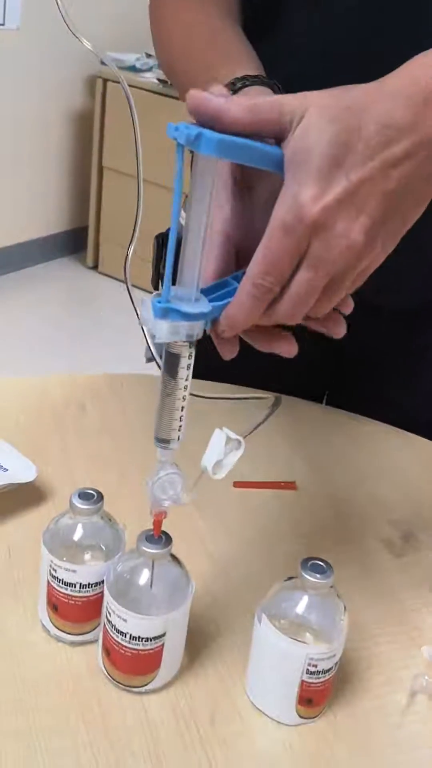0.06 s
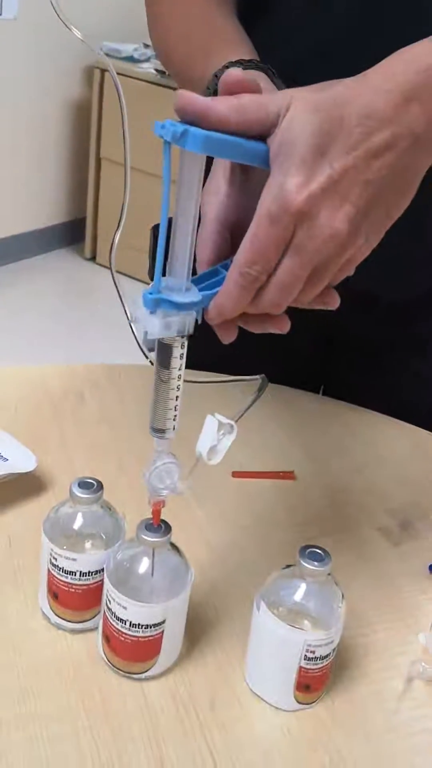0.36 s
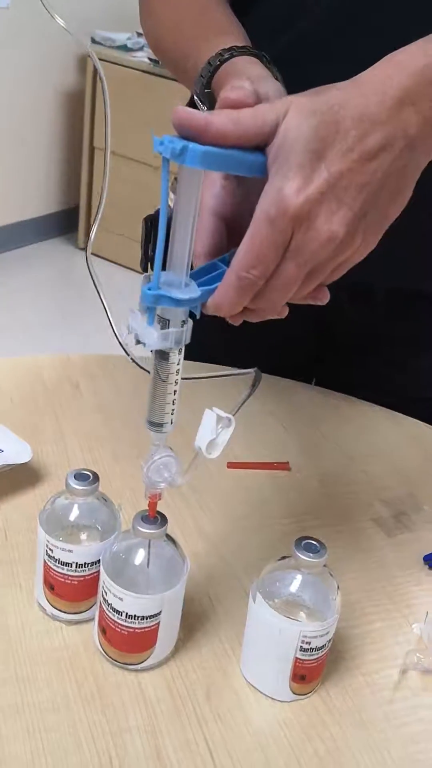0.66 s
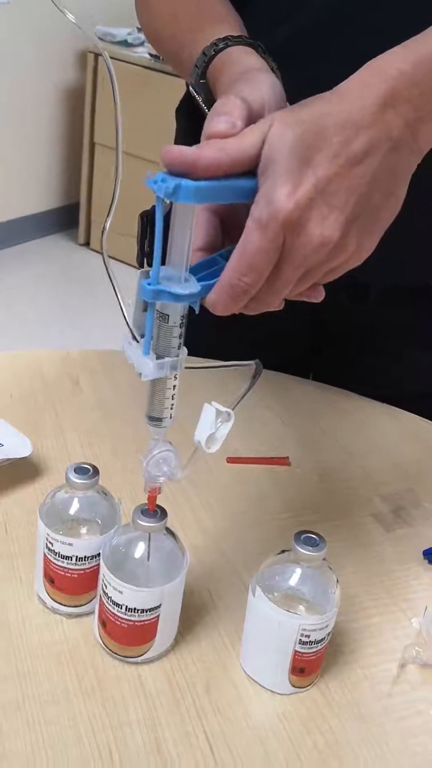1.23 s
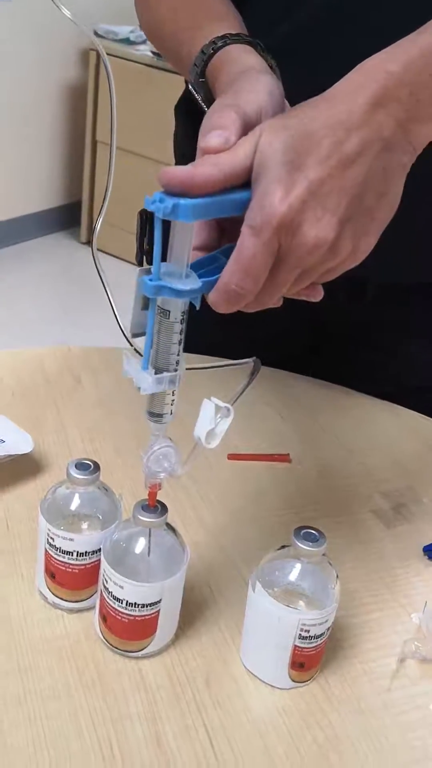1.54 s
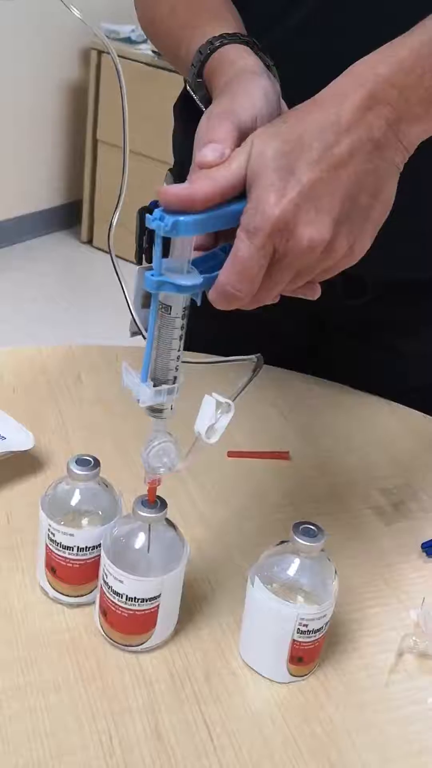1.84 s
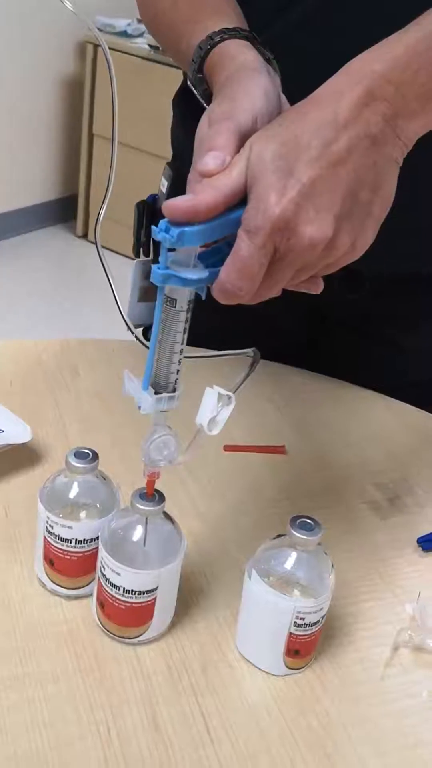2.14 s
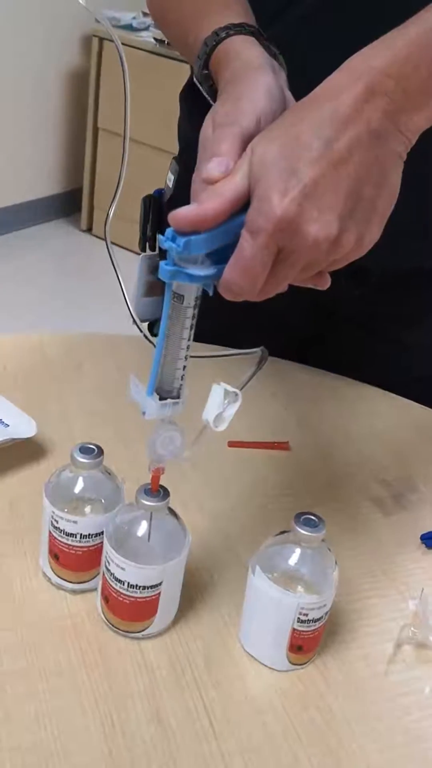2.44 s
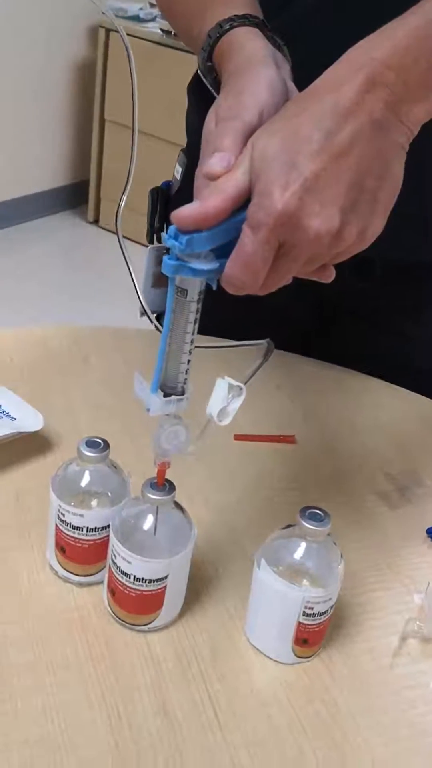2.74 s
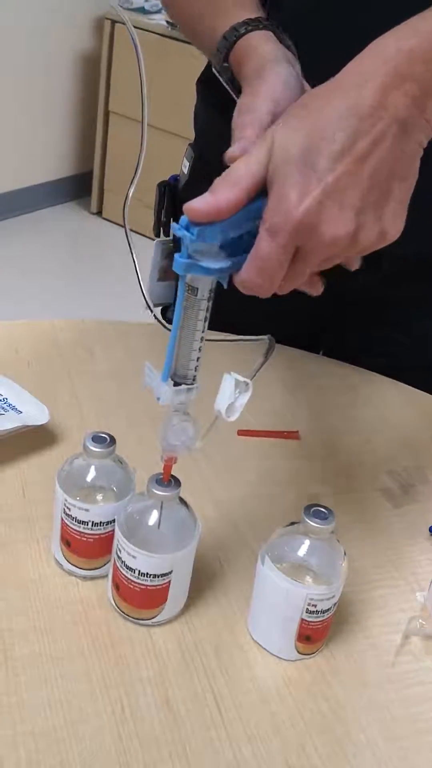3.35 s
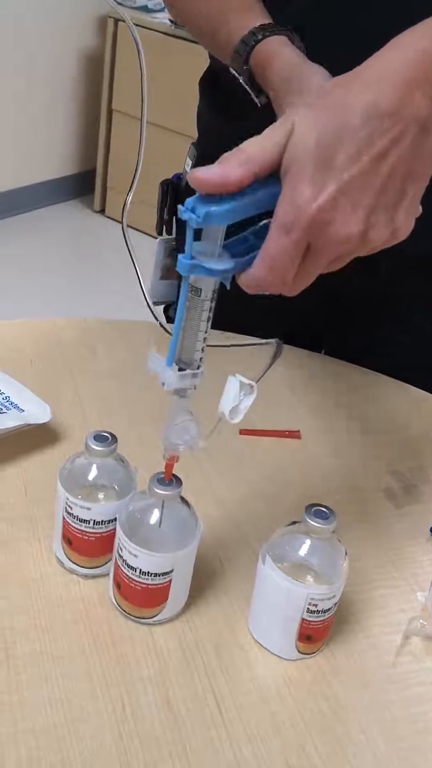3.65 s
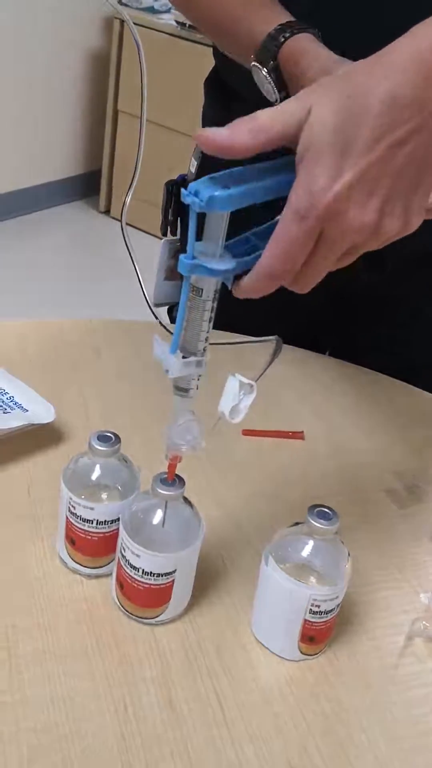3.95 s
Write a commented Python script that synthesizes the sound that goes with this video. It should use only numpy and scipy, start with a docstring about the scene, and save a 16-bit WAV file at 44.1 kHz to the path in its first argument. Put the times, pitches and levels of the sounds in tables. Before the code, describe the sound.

A syringe plunger squeaks as it is pressed down, ending in small plastic clicks.

```python
"""A quiet room, a stereo microphone close to a table, ventilation rumbling throughout. One hollow knock.
Then, right of centre, a syringe is pressed empty into a glass vial: the rubber plunger sticks and slips,
squeaking upward and shuddering as it gathers speed, then slides softly while the needle hisses. The hand
on the microphone shifts with a deep thud. The plunger squeaks downward as it slows and bottoms out with
plastic clicks. A few fainter clicks follow, and one dry pop right by the microphone."""
import sys
import numpy as np
from scipy import signal
from scipy.fft import rfft, irfft
from scipy.io import wavfile
from scipy.ndimage import uniform_filter1d

SR = 44100
rng = np.random.default_rng(int(sys.argv[2]) if len(sys.argv) > 2 else 0)


def waveform_to_disk(signal):
    """Save audio, clipped to [-1, 1], as 16-bit WAV at the path in sys.argv[1]."""
    frames = np.transpose(np.atleast_2d(signal))
    scaled = np.clip(frames, -1, 1) * 32767
    samples = np.round(scaled).astype(np.int16)
    wavfile.write(sys.argv[1], SR, samples)


N = 176400
T = np.arange(N) / SR
FREQS_HZ = np.fft.rfftfreq(N, 1 / SR)


def amp(db):
    """Decibels to gain."""
    return 10 ** (np.asarray(db) / 20)


def unit(x):
    """Scales to rms 1."""
    return x / np.sqrt(np.mean(x ** 2) + 1e-20)


def read(points, hz):
    """Reads a table on a log-frequency axis."""
    f, value = np.transpose(points)
    return np.interp(np.log(hz + 1), np.log(f + 1), value)


def follow(rows):
    """A gate for the table's span, then each column as a curve in time."""
    times, *columns = np.transpose(rows)
    gate = np.clip(np.minimum(T - times[0], times[-1] - T) / 0.0023, 0, 1)
    return [gate] + [np.interp(T, times, column) for column in columns]


def add(mix, start_s, sound):
    """Mixes a sound in at a time."""
    part = mix[round(start_s * SR):][:len(sound)]
    part += sound[:len(part)]


def noise(colour, size=N, tilt_db=0):
    """Noise of a given colour, tilted per octave."""
    hz = np.fft.rfftfreq(size, 1 / SR)
    gain = amp(read(colour, hz) + tilt_db * np.log2(hz + 1))
    return unit(irfft(rfft(rng.standard_normal(size)) * gain, size))


def wander(hz):
    """Smooth random motion up to a rate, at rms 1."""
    return unit(irfft(rfft(rng.standard_normal(N)) / (1 + (FREQS_HZ / hz) ** 4), N))


def phase_of(hz):
    """Running phase of a moving pitch."""
    return 2 * np.pi * np.cumsum(hz) / SR


def mode(t, hz, db, t60):
    """One dying resonance at a random phase."""
    return amp(db - 60 * t / t60) * np.sin(2 * np.pi * (hz * t + rng.random()))


# Spectrum of the room tone: freq_hz, gain_db
VENT_COLOUR = [(12, -10), (26, 2), (40, -9), (50, -9), (61, -4), (80, -12), (100, -16), (125, -12),
               (165, -18), (205, -25), (238, -21), (306, -32), (440, -39), (550, -44), (830, -43),
               (1300, -45), (2030, -45), (2800, -50), (4000, -54), (7000, -55), (9000, -61), (15500, -65)]
# Likeness of left and right: freq_hz, coherence (0-1)
VENT_COHERENCE = [(20, 1), (150, 1), (300, 0.59), (700, 0.17), (1500, 0.36), (15000, 0.3)]

def ventilation():
    """Ventilation fills the room, its rumble alike on both sides, with a wavering hum."""
    coherence = np.clip(read(VENT_COHERENCE, FREQS_HZ), 0, 1)
    mid = irfft(rfft(noise(VENT_COLOUR)) * np.sqrt((1 + coherence) / 2), N)
    side = irfft(rfft(noise(VENT_COLOUR)) * np.sqrt((1 - coherence) / 2), N)
    hum_hz, hum_db = 122.8, -64.5
    hum_peak = np.sqrt(2) * amp(hum_db + 2 * wander(hz=4))
    hum = hum_peak * np.sin(2 * np.pi * hum_hz * T + 0.5 * wander(hz=6.3))
    return amp(-49.5) * np.array([mid + side, mid - side]) + hum


# Resonances of the hollow body: pitch_hz, gain_db, t60_s
KNOCK_MODES = [(324.7, -9.5, .15), (476, -19, 0.089), (587, -11, .17), (732, -14.5, 0.23),
               (901, -10.5, 0.16), (1124, -8, 0.17), (1242.5, -1, 0.15), (1281, -1, 0.15),
               (1300, -8, 0.039), (1555, -7.5, 0.11), (1630, -5.5, 0.13), (1734, -13.5, .12),
               (1909, -14, 0.15)]
# Contacts within the knock: start_s, gain_db
KNOCK_CONTACTS = [(0.056, -30.5), (0.0587, -25.5), (0.0626, -28.5), (0.0672, -28)]
# Spectrum of each contact: freq_hz, gain_db
CRACK_COLOUR = [(200, -21), (320, -4.5), (550, -3), (800, 2), (1300, 1), (1900, -1), (2600, -18),
                (3300, -29), (3900, -23.5), (4600, -28.5), (5500, -25), (8000, -40.5), (15000, -62)]

def knock():
    """At centre, a quick rattle of contacts rings one hollow body."""
    t, out = np.arange(SR // 2) / SR, np.zeros(N)
    ring = sum(mode(t, hz, db, t60) for hz, db, t60 in KNOCK_MODES)
    add(out, start_s=0.058, sound=amp(-35.5) * np.minimum(t / 0.0014, 1) * ring)
    envelope = np.minimum(t / 0.00027, 1) * np.exp(-t / 0.0055)
    for start_s, db in KNOCK_CONTACTS:
        add(out, start_s, amp(db - 10) * envelope * noise(CRACK_COLOUR, size=len(t)))
    return out


# Strength of the rubbing: time_s, gain_db
SLIDE_LEVEL = [(.36, -107), (.41, -62.5), (.7, -62.5), (.95, -67.5), (1.3, -67.5), (1.85, -69.5),
               (2.1, -64.5), (2.45, -62), (2.6, -62), (2.72, -82), (2.85, -84)]
# Spectrum of sliding rubber: freq_hz, gain_db
SLIDE_COLOUR = [(300, -18), (650, -16), (830, 3.5), (900, -1), (980, 9.5), (1100, -9), (1270, 2),
                (1430, -15.5), (1650, 5), (2100, -7.5), (2500, -7.5), (3200, -16.5), (5500, -20.5),
                (6500, -17), (7200, -9.5), (7850, -5), (8250, -22), (9500, -13.5), (10800, -21.5),
                (13500, -20), (15500, -24.5)]

def slide():
    """The plunger rubs along the barrel with a soft, uneven hiss."""
    gate, db = follow(SLIDE_LEVEL)
    return gate * amp(db + 1.5 * wander(hz=40)) * noise(SLIDE_COLOUR)


# Four squeaks, each: time_s, pitch_hz, first_db, second_db, treble_db, between_db, judder (0-1)
# first and second are harmonics; between is the gain of the partials halfway between harmonics.
# The plunger gathers speed:
SQUEAK_SPEEDING = [(.365, 1244, -75, -82, -72.5, -3, 0), (.395, 1361, -75, -70, -74, -4, .05),
                   (.41, 1432, -57.5, -62, -52.5, -2, 0.1), (.465, 1469, -58, -66, -49.5, -7, 0),
                   (.505, 1481, -68, -55, -60, -13, 0.54), (.555, 1523, -54, -55.5, -62, -15, 0.6),
                   (.595, 1541, -49.5, -69, -59, -17, .08), (.634, 1564, -49, -48.5, -60.5, -13, 0.38),
                   (.644, 1576, -49.5, -56, -57.5, -10, 0.83), (.705, 1611, -51, -53, -56.5, 10, 0.82),
                   (.77, 1670, -47.5, -60, -62, 21, 0.81), (.81, 1705, -63, -62, -60.5, 4, 0.22),
                   (.855, 1722, -50.5, -62, -65.5, -4, 0.01), (.91, 1732, -48, -64, -63.5, -5, 0.39),
                   (.955, 1755, -83, -87, -74, 1, 0), (1.0, 1792, -61.5, -91, -84, 1, 0.2),
                   (1.05, 1804, -80, -97, -79, -5, 0.02)]
# It slows:
SQUEAK_SLOWING = [(1.965, 1770, -78, -69, -87, -10, 0.031), (1.99, 1757, -84, -54.5, -69.5, -4, 0.016),
                  (2.04, 1736, -65, -58, -69, -9, 0.024), (2.115, 1711, -49, -51.5, -54.5, -5.5, 0.15),
                  (2.15, 1720, -51.5, -56.5, -66.5, -14, 0.76), (2.175, 1670, -63, -67, -59.5, -6, 0.91),
                  (2.2, 1607, -55.5, -53, -56, 17, 0.58), (2.265, 1579, -50.5, -55.5, -54.5, 2, 0.68),
                  (2.29, 1577, -84, -67, -63.5, -6, 0.15), (2.345, 1561, -51.5, -61, -63.5, 1, 0.18),
                  (2.405, 1557, -60.5, -60, -64, 0, 0.25), (2.428, 1594, -42, -54, -60, -10, .6),
                  (2.46, 1542, -53.5, -75, -60, -5, 0.56), (2.52, 1486, -58.5, -74, -64.5, -2, 0.67)]
# A second patch of rubber squeals just below the first:
SQUEAK_SECOND_PATCH = [(2.335, 1470, -81, -74, -77, -10, 0.15), (2.37, 1484, -82, -60, -61.5, -8, 0),
                       (2.41, 1467, -87, -61, -63.5, -5, .1), (2.43, 1480, -80, -81, -84, -8, .2)]
# Lower chirps as the rubber seats:
SQUEAK_SEATING = [(2.44, 1292, -63, -78, -76, -10, 0.2), (2.455, 1296, -54, -73, -81, -7, .2),
                  (2.485, 1294, -54, -63, -66, -12, .2), (2.515, 1400, -72, -70, -70, 9, 0.1),
                  (2.53, 1269, -73, -68, -60, -8, 1), (2.55, 1287, -65, -59, -62, -2, 0.5),
                  (2.566, 1271, -68, -63, -61, -8, 0.51), (2.585, 1288, -68, -74, -64, -4, .3),
                  (2.62, 1330, -82, -80, -85, -7, .3)]
# The barrel's colouring of upper partials and rasp: freq_hz, gain_db
BARREL_COLOUR = [(700, -23), (2100, -13.5), (2550, 5), (3300, -25), (3950, 4), (4300, -4.5), (4650, -9.5),
                 (4950, 2), (5200, 3.5), (5500, -10), (5850, -3), (6250, -11.5), (6600, 0.5), (7200, 5),
                 (7750, -0.5), (8400, -13), (9500, -19), (10800, -20.5), (12500, -11.5), (14500, -21),
                 (15500, -22)]

def squeak(rows, judder_hz):
    """Rubber sticks and slips, strong and weak in turn; judder breaks the tone into rasping bursts."""
    gate, hz, first_db, second_db, treble_db, between_db, judder = follow(rows)
    beat = np.sin(phase_of(judder_hz * (1 + 0.2633 * wander(hz=30.94))))
    bursts = amp(5.5 * judder * (np.tanh(2 * beat) + 0.6 * wander(hz=141)))
    bursts /= np.sqrt(uniform_filter1d(bursts ** 2, SR // 20))  # even power over 50 ms
    waver = 1 + 0.001454 * wander(hz=65) + 0.0481 * judder ** 2 * wander(hz=358)
    phase = phase_of(hz * waver)
    partials, power = np.zeros(N), np.zeros(N)
    on = gate > 0
    for k in [3, *range(5, 23)]:  # multiples of half the pitch; 2 and 4 are first and second below
        gain = amp(read(BARREL_COLOUR, k * hz[on] / 2) + between_db[on] * (k % 2))
        partials[on] += gain * np.cos(k * phase[on] / 2 + 2 * np.pi * rng.random())
        power[on] += gain ** 2 / 2
    rasp = amp(6) * (0.03 + judder ** 2) * bursts ** 0.23 * noise(BARREL_COLOUR, tilt_db=-0.2)
    treble = amp(treble_db) * bursts * (partials / np.sqrt(power + 1e-12) + rasp)
    first = amp(first_db) * np.cos(phase) * bursts ** 0.5
    second = amp(second_db) * np.cos(2 * phase) * bursts ** 0.36
    return gate * (np.sqrt(2) * (first + second) + treble)


# Shaking of the holder: time_s, pitch_hz, level_db
HOLDER_SHAKE = [(.5, 110, -59), (.6, 116, -47.5), (.68, 124, -48), (.78, 120, -41.5), (.85, 116, -53),
                (1.05, 114, -69.5), (1.8, 116, -76.5), (2.1, 122, -54.5), (2.3, 122, -69)]

def shudder():
    """The juddering plunger shakes the holder at a low pitch."""
    gate, hz, db = follow(HOLDER_SHAKE)
    envelope = gate * amp(db + 2 * wander(hz=25))
    return envelope * np.sqrt(2) * np.sin(phase_of(hz * (1 + 0.0856 * wander(hz=37.5))))


# Hiss band of the needle: time_s, centre_hz, gain_db
NEEDLE_BAND = [(.7, 10300, -67.5), (.85, 10250, -75.5), (1.3, 10100, -75.5), (1.9, 9630, -78.5),
               (2.35, 9670, -103), (2.62, 9250, -79), (2.78, 9200, -95)]

def needle(width_hz=310):
    """Liquid hisses through the needle in one thin, high band."""
    gate, hz, db = follow(NEEDLE_BAND)
    phase = phase_of(hz)
    band = wander(width_hz / 2) * np.cos(phase) + wander(width_hz / 2) * np.sin(phase)
    return gate * amp(db) * band


# Bumps on the microphone body: peak_s, pitch_hz, level_db
HANDLING_BUMPS = [(1.282, 27.8, -38), (1.559, 27.4, -50), (3.331, 34, -40)]

def handling(width_s=0.031):
    """The hand that holds the microphone shifts: a cycle or two of deep thud."""
    return sum(amp(db) * np.exp(-((T - peak_s) / width_s) ** 2) * np.cos(2 * np.pi * hz * (T - peak_s))
               for peak_s, hz, db in HANDLING_BUMPS)


# Clicks of syringe and holder: start_s, gain_db, decay_s, tilt_db_per_octave
PLASTIC_CLICKS = [(1.962, -55, 0.0037, 1), (2.427, -44, 0.0033, 0.5), (2.444, -36.5, 0.0014, 6),
                  (2.5244, -36.5, 0.0049, 2.5), (2.5621, -36, 0.0052, 1.5), (3.2727, -55.5, 0.002, 5),
                  (3.3772, -64, 0.005, 2), (3.494, -60.5, 0.0022, 7), (3.5294, -50.5, 0.0069, 4.5),
                  (3.6857, -64.5, .004, 5), (3.753, -64, 0.0025, 3.5), (3.8497, -63.5, 0.0025, 6),
                  (3.986, -54.5, .003, 3)]
# Spectrum of a snap: freq_hz, gain_db
SNAP_COLOUR = [(300, -28), (700, -22), (950, 2), (1200, -14), (1600, 7.5), (1950, -0.5), (2450, 9),
               (3400, -7), (5000, -8), (6000, -9.5), (7000, -2.5), (8300, -21), (11000, -25), (15500, -27)]
# The barrel's ring after a click: pitch_hz, gain_db, t60_s
BARREL_MODES = [(974, -22, 0.22), (1623, 4.5, 0.081), (2386, -7.5, 0.044), (2540, -4.5, 0.041),
                (3120, -9, 0.012), (5210, -2, 0.034), (6840, 1.5, 0.011)]

def clicks():
    """Short snaps ring the plastic barrel."""
    t, out = np.arange(SR // 5) / SR, np.zeros(N)
    attack = np.minimum(t / 0.00062, 1)
    for start_s, db, decay_s, tilt_db in PLASTIC_CLICKS:
        snap = np.exp(-t / decay_s) * noise(SNAP_COLOUR, size=len(t), tilt_db=tilt_db)
        ring = sum(mode(t, hz, mode_db + tilt_db * np.log2(hz / 5000), t60)
                   for hz, mode_db, t60 in BARREL_MODES)
        add(out, start_s, amp(db) * attack * (amp(-1.5) * snap + amp(-10) * ring))
    return out


def pop(start_s=3.9743, pitch_hz=1440, decay_s=0.00058):
    """One dry little pop close to the microphone."""
    t, out = np.arange(SR // 50) / SR, np.zeros(N)
    envelope = np.minimum(t / 0.00023, 1) * np.exp(-t / decay_s)
    add(out, start_s, amp(-32.5) * envelope * np.sin(2 * np.pi * pitch_hz * t))
    return out


# Decay of the room: freq_hz, t60_s
ROOM_DECAY = [(200, 0.78), (1000, 0.17), (3000, 0.44), (8000, 0.09), (15000, 0.21)]

def room(x, early_db, tail_db):
    """Direct sound, quick reflections off table and hands, and a tail that lasts longest in the bass."""
    t = np.arange(SR // 2) / SR
    hz, frame_s, spectrum = signal.stft(rng.standard_normal((2, len(t))), SR, nperseg=256)
    decay = amp(-60 * frame_s / read(ROOM_DECAY, hz)[:, None])
    tail = signal.istft(spectrum * decay, SR, nperseg=256)[1][:, :len(t)] * np.minimum(t / 0.0085, 1)
    early = rng.standard_normal((2, len(t))) * np.exp(-t / 0.0033) * (t > 0.0005)
    response = (amp(early_db) * unit(early) + amp(tail_db) * unit(tail)) / np.sqrt(len(t))
    response[:, 0] += 1  # the direct path
    response /= np.linalg.norm(response, axis=1, keepdims=True)
    return signal.fftconvolve(x[None], response, axes=1)[:, :N]


# The syringe's balance at the microphone: freq_hz, right_over_left_db
RIGHT_BIAS = [(500, 5.5), (1600, 1), (3200, 5), (5000, 6.5), (7300, 18), (9800, 0.5), (12500, 5),
              (15000, 15)]

def place_right(x, lag_ms):
    """The syringe reaches the right side of the microphone sooner and more strongly."""
    gains = amp(read(RIGHT_BIAS, FREQS_HZ) * np.array([[-0.5], [0.5]]))
    left_delay = np.exp(-2j * np.pi * FREQS_HZ * lag_ms / 1000 * np.array([[1], [0]]))
    return irfft(rfft(x) * left_delay * gains / np.sqrt((gains ** 2).mean(0)), N)


def scene():
    """From the microphone: syringe to the right, knock at centre, ventilation all round."""
    squeaks = squeak(SQUEAK_SPEEDING, judder_hz=58.66) + squeak(SQUEAK_SLOWING, judder_hz=47.1)
    squeaks += squeak(SQUEAK_SECOND_PATCH, judder_hz=47) + squeak(SQUEAK_SEATING, judder_hz=63.7)
    syringe = amp(1.5) * room(squeaks, early_db=-7, tail_db=-6)
    syringe += amp(-0.5) * room(slide() + needle(), early_db=-4, tail_db=7)
    syringe += amp(2) * room(clicks(), early_db=-7.5, tail_db=-10)
    hollow_knock = amp(5) * room(knock(), early_db=-0.5, tail_db=-2.5)
    close_sounds = shudder() + handling() + pop()
    return place_right(syringe, lag_ms=0.12) + hollow_knock + close_sounds + ventilation()


def record(dry):
    """The recorder's band limit."""
    cutoff_hz = 15650
    lowpass = signal.firwin(511, cutoff_hz, window=("kaiser", 9), fs=SR)
    return signal.oaconvolve(dry, lowpass[None], "same")


dry = scene()
out = record(dry)
waveform_to_disk(out)
```